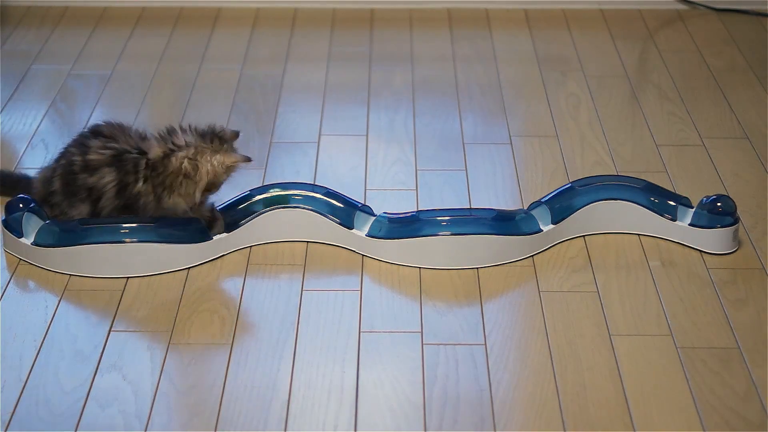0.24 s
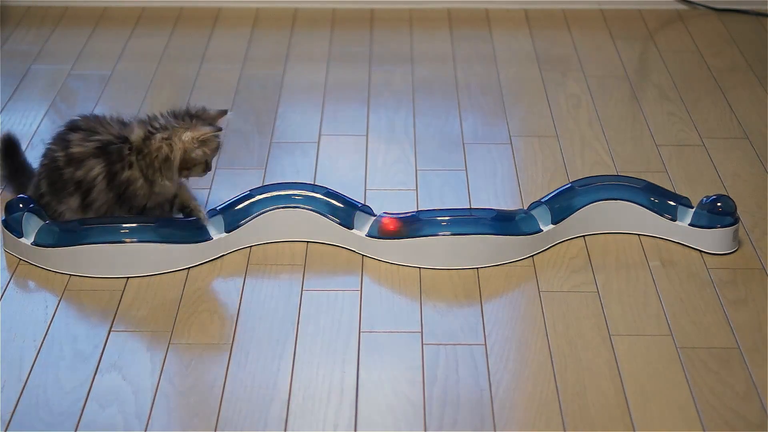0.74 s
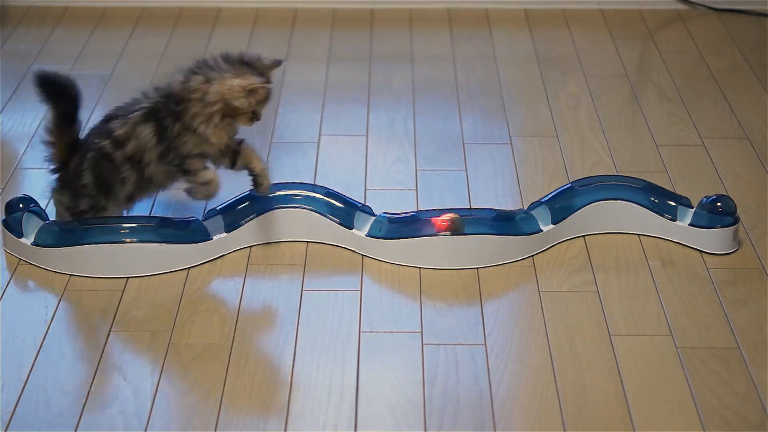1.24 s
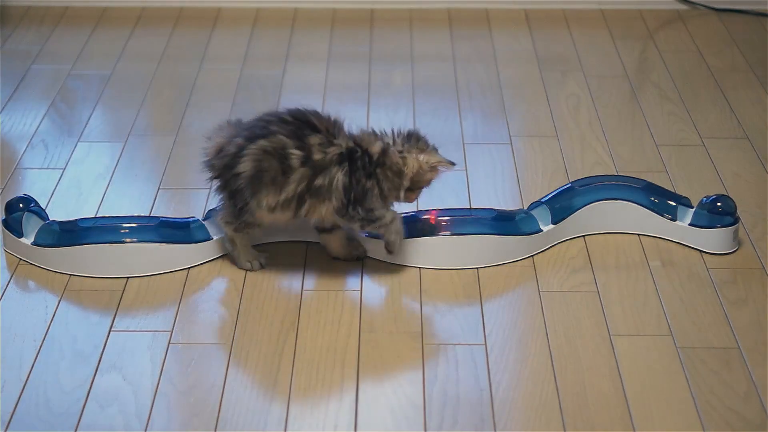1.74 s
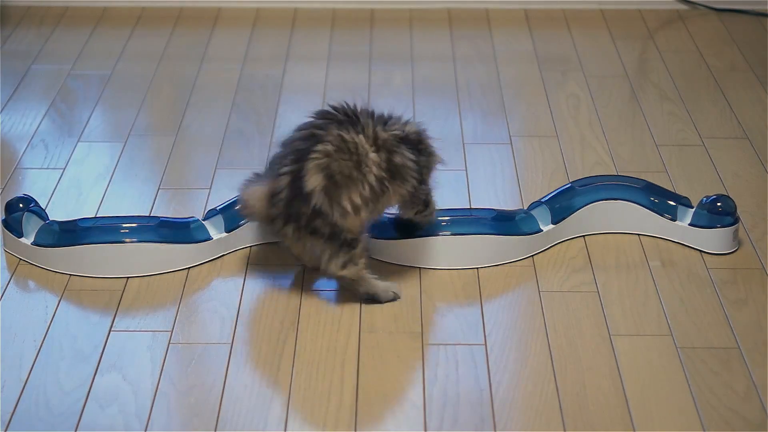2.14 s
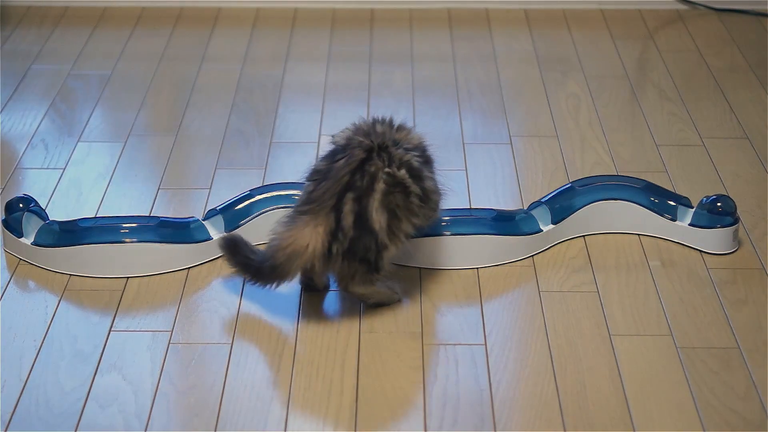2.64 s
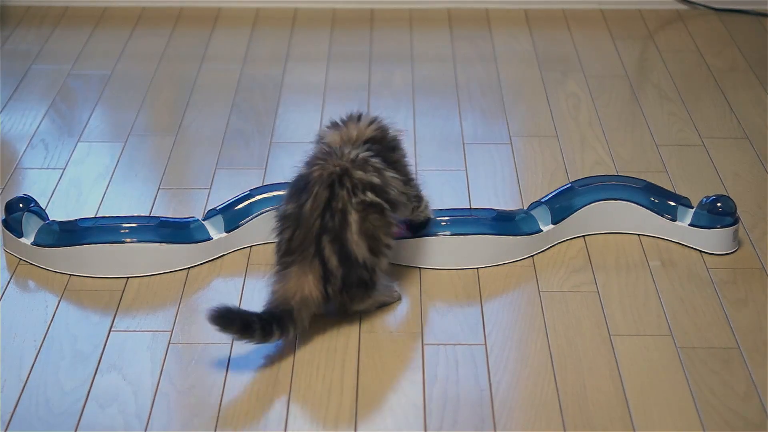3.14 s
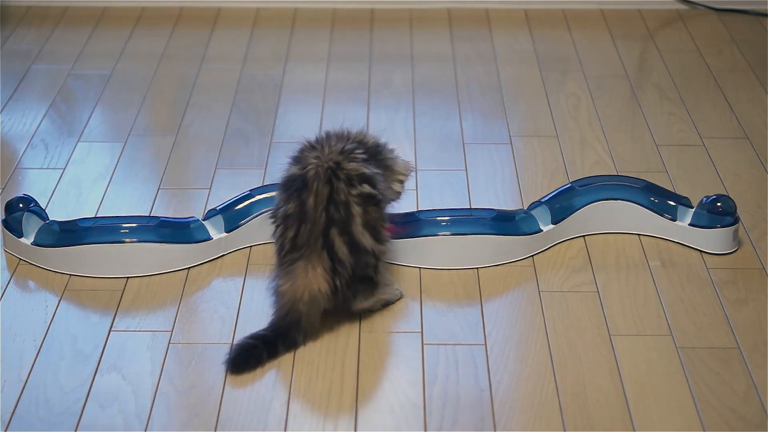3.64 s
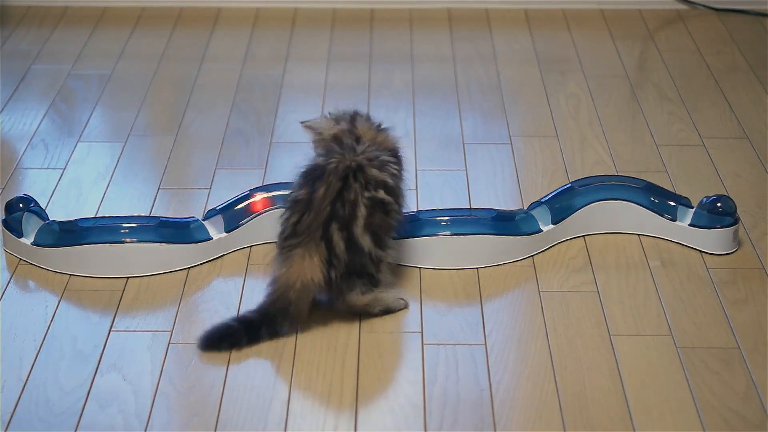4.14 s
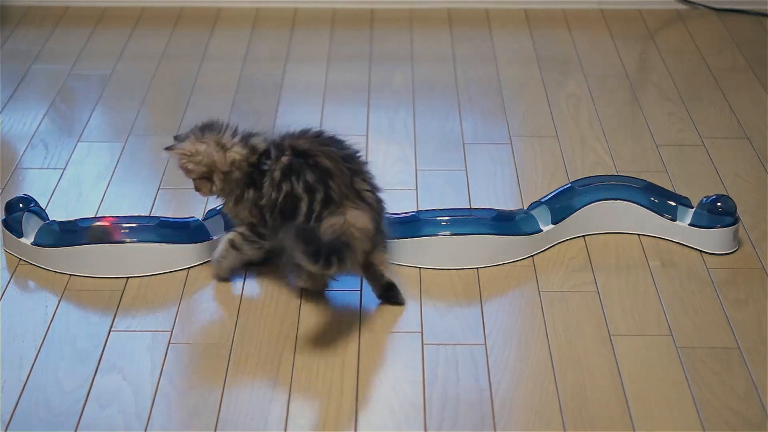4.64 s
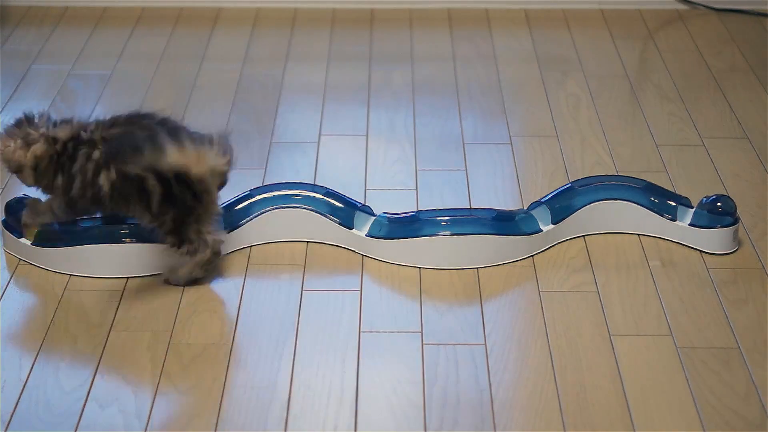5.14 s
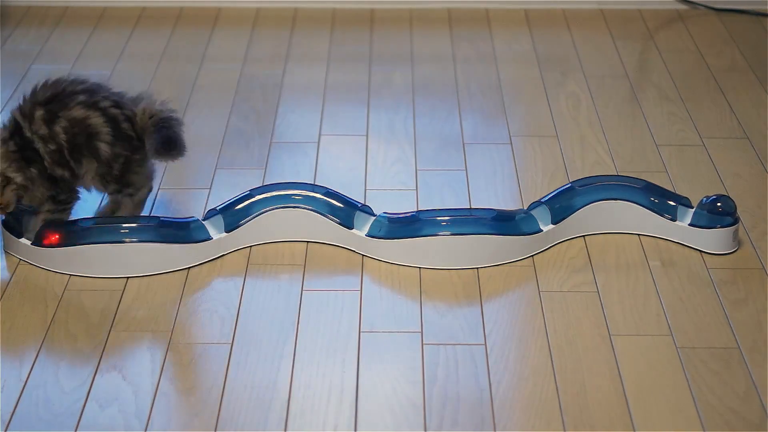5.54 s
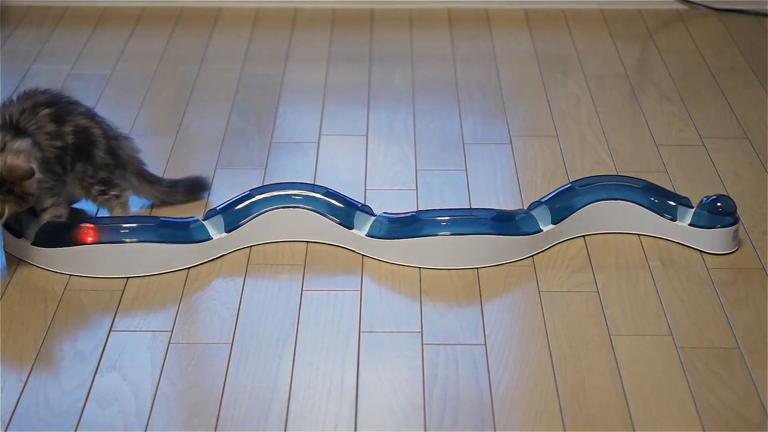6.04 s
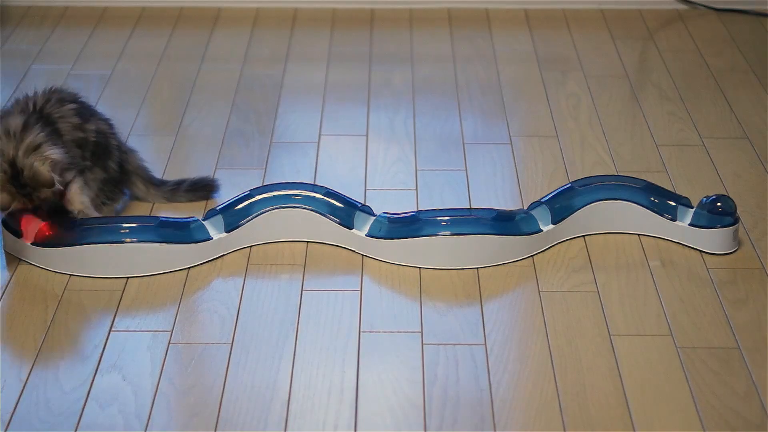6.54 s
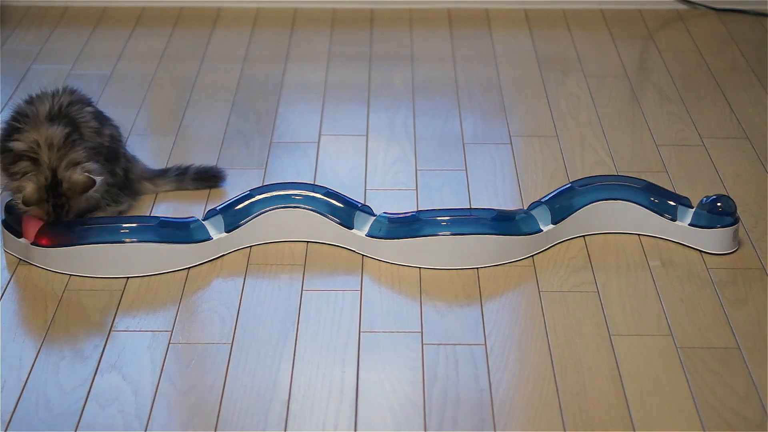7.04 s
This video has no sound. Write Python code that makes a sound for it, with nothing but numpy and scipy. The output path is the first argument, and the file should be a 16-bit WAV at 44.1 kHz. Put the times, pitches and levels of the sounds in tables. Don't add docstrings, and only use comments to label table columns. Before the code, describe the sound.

Uneven bursts of hollow plastic knocks and ball rolling as a kitten plays with a track toy on wooden boards, over soft ventilation hiss.

```python
import sys
import numpy as np
from scipy import signal
from scipy.fft import rfft, irfft
from scipy.io import wavfile
from scipy.ndimage import uniform_filter1d

SR = 44100
rng = np.random.default_rng(int(sys.argv[2]) if len(sys.argv) > 2 else 0)


def pcm_store(signal):
    levels = np.round(np.clip(np.atleast_2d(signal), -1, 1) * 32767)
    wavfile.write(sys.argv[1], SR, levels.astype(np.int16).T)


def attenuation_scalar(level_db):
    decades = np.asarray(level_db, float) / 20
    return 10 ** decades


N = 321489

# start in seconds, blow peak in dB, shell pitch in Hz,
# wall ring over shell in dB, wall pitch in Hz.
BALL_KNOCKS = [(0.275, -20.5, 1055, -13, 1840), (0.295, -23, 980, -14, 2290), (0.748, -31, 1200, -13, 2190),
               (0.78, -26, 1120, -3, 1890), (0.792, -35, 1380, 0.5, 2800), (3.086, -42, 1100, -9.5, 2200),
               (3.351, -51, 1130, -22, 2060), (4.052, -47.5, 1180, 2.5, 2680),
               (4.104, -33.5, 1670, -10, 1870), (4.354, -48, 990, -11, 1670),
               (4.393, -14, 1090, -7.5, 1950), (4.407, -15, 1001, -47, 1930), (4.96, -35, 1170, -5.5, 3517),
               (5.188, -36.5, 1100, -9, 2080), (5.347, -55, 1578, -3, 1830), (5.782, -32.5, 1379, -6, 2670),
               (6.187, -55.5, 1160, 4, 2560), (6.431, -20.5, 1131, -7, 1870)]
# start in seconds, blow peak in dB, shell pitch in Hz,
# wall ring over shell in dB, wall pitch in Hz.
PAW_BATS = [(0.206, -25, 1000, -12.5, 2290), (0.817, -25, 890, -11, 1890), (2.058, -28.5, 1228, -6.5, 1930),
            (2.084, -41, 1640, 0, 1930), (2.108, -25, 1230, -7.5, 2200), (2.129, -28, 980, -8.5, 1950),
            (2.752, -26, 1200, -6, 2260), (2.762, -25, 1130, -7, 1930), (2.777, -37, 1180, -8, 1810),
            (4.112, -24, 1080, -10.5, 2160), (4.157, -6.5, 1080, -22.5, 2710),
            (4.219, -30, 1250, -15, 2450), (4.249, -25.5, 1160, -16, 2260), (4.311, -31.5, 1060, -7, 2300),
            (4.344, -21.5, 1160, -4, 1960), (4.972, -44.5, 1360, 6, 1860), (5.218, -39.5, 1030, -0.5, 1760),
            (5.248, -32.5, 1120, -16, 1930), (5.441, -37, 1480, -3, 2700), (5.447, -31, 1520, -12.5, 2920),
            (6.004, -32.5, 930, -22, 2220), (6.459, -21.5, 1080, -17.5, 2350),
            (6.718, -40.5, 1120, -12, 2250)]
# start in seconds, blow peak in dB, shell pitch in Hz,
# wall ring over shell in dB.
BASE_BUMPS = [(0.307, -21, 995, -26), (0.319, -32, 980, -15), (0.334, -37, 1110, -22),
              (0.462, -39, 1010, -27), (0.694, -36, 920, -10), (0.869, -30.5, 950, -15.5),
              (1.689, -39, 1260, -8.5), (1.893, -29.5, 1150, -19), (2.006, -35, 970, -5.5),
              (2.648, -47, 1150, -11.5), (2.7, -31.5, 1000, -12.5), (2.925, -43, 910, -9),
              (2.96, -46, 1030, -20), (3.011, -46, 984, -16), (3.979, -42, 1100, -3),
              (4.449, -22, 1090, -10), (4.468, -25.5, 1055, -32), (5.307, -42.5, 1550, -20),
              (5.793, -31.5, 1051, -9.5), (6.445, -33, 1030, 0.5), (6.49, -35, 1005, -4.5),
              (7.072, -46, 1155, -10)]
BALL_CRACK_DB, PAW_CRACK_DB, BASE_CRACK_DB = -18, -31, -21.5
BASE_WALL_HZ = 2250
# ratio to shell pitch, width in Hz, level in dB.
CAVITY_MODES = [(.62, 200, -31), (.9, 120, 4), (1.03, 133, 65), (1.33, 248, -41)]
# ratio to wall pitch, width in Hz, level in dB.
WALL_MODES = [(.72, 460.5, -49), (1.0, 481, 9.5), (1.3, 647.8, -2.5), (1.8, 703, -9)]
# frequency in Hz, width in Hz, level in dB.
JOINT_MODES = [(765, 400, 13.5), (1550, 277, 14), (2770, 1870, -7)]
# frequency in Hz, width in Hz, level in dB.
CRACK_MODES = [(4800, 850, -11), (5820, 2700, 5.5), (9400, 4300, -3.5), (12000, 9400, -4)]
# fastest moment in seconds, shell level in dB, speeding up in seconds,
# slowing in seconds, shell pitch in Hz.
BALL_RUNS = [(0.26, -42.5, 0.1, 0.23, 1062), (0.768, -54.5, 0.77, 1, 1105), (1.6, -61.5, 0.22, .6, 1080),
             (2.084, -36.5, .15, 0.16, 1160), (2.622, -53, 0.17, 0.61, 1060),
             (2.932, -44, 0.05, 0.18, 1154), (3.3, -61.5, 0.53, 0.18, 1100), (4.162, -56, 0.16, 0.36, 1100),
             (4.32, -40, 0.24, 0.053, 1170), (4.7, -53.5, 0.91, 0.22, 1030), (4.95, -41, 0.19, 0.083, 1180),
             (5.2, -53, 0.26, 0.19, 1760), (5.33, -51.5, 0.16, 0.23, 1550), (5.65, -85, .15, 0.36, 1080),
             (6.0, -50, 0.28, .2, 1050), (6.5, -51.5, 0.22, 0.39, 1170), (7.05, -62, 0.32, 0.52, 1170)]
CREEP_DB, ROLL_WALL_DB = -74.5, -8
# peak in seconds, level in dB, onset in seconds, fade in seconds,
# squeak centre in Hz.
BRUSHES = [(0.0, -51, .01, 0.025, 4100), (0.626, -61.5, 0.24, 0.075, 5270), (0.79, -57, 0.025, 0.093, 4900),
           (1.285, -67, .06, .17, 4800), (1.694, -48.5, 0.0088, 0.023, 5150),
           (3.336, -57, 0.043, 0.061, 5250), (3.98, -59.5, .018, 0.085, 4250), (4.056, -60, .014, .1, 4150),
           (4.165, -48, .015, 0.048, 4450), (5.158, -60, 0.026, .12, 4200),
           (5.316, -61.5, .025, 0.11, 4050), (6.062, -54.5, 0.044, 0.19, 4300),
           (6.19, -58, 0.022, 0.029, 4080), (6.374, -56, 0.026, .028, 5050)]
# frequency in Hz, density in dB per Hz.
FRICTION_SPECTRUM = [(710, -39), (1200, 2), (2050, 5.5), (2770, 3), (3320, -3.5), (5730, -5.5),
                     (15500, -12.5)]
# start in seconds, peak in dB, pitch in Hz, t60 in seconds.
LANDINGS = [
    (1.445, -33, 272.7, 0.025),
]
# frequency in Hz, t60 in seconds.
REVERB_TIMES = [(250, 0.44), (700, 0.48), (1100, 0.34), (2500, 0.38), (6000, 0.28), (14000, 0.078)]
# delay in seconds, level in dB.
EARLY_ECHOES = [(.0055, -8.5), (.0078, -8), (0.011, -1), (0.0165, -21), (.021, -9.5), (.0235, -15.5)]
# frequency in Hz, density in dB per Hz.
AIR_SPECTRUM = [(12, -78), (20, -44), (187, -22), (228, -4), (301, -17.5), (377, -3.5), (513, -10),
                (607, -4.5), (738, -9), (976, -6.5), (1370, -11), (2260, -14.5), (2460, -17),
                (12800, -27.5), (16000, -29.5)]
AIR_DB = -54.5
# frequency in Hz, width in Hz, level in dB.
VENT_HUMS = [(165, 18.7, -76), (324, 35, -69), (398, 14, -67.5), (439.5, 12, -66), (611, 12, -68.5),
             (2248, 46, -69.5)]
# frequency in Hz, left-right likeness from -1 to 1.
COHERENCE = [(60, 0.25), (180, 0.95), (550, 0.52), (1650, -0.37), (4970, -0.078), (15000, 0.45)]
# frequency in Hz, left minus right in dB.
BALANCE = [(60, -1), (240, 2), (950, 0), (3770, 0.0), (15000, 0.0)]


def knock(db, shell_hz, wall_db, crack_db, wall_hz, chance):
    t = np.arange(len(chance[0])) / SR
    loose = np.clip((-db - 20.5) / 24, .15, 1.2)
    bounces = chance[0] * (chance[1] > 2.6) * loose * np.exp(-t / 0.014)
    bounces[0] = 1

    chatter = .055 * chance[1, :500] * np.exp(-t[:500] / .003)
    chatter[0] = 1
    crack_chatter = chatter * np.where(t[:500] > 0, 4.5, 1)
    crack = np.convolve(crack_chatter, ring(CRACK_MODES))[:1024]
    wall = np.convolve(chatter, wall_ring(wall_hz, -3.0))[:1024]

    damping = np.clip(2.5 + (wall_db + 9.5) / 14, .8, 2.5)
    body = ring(np.multiply(CAVITY_MODES, [1, damping, 1]), shell_hz)
    body += attenuation_scalar(wall_db + 6) * wall / np.linalg.norm(wall)
    body += attenuation_scalar(crack_db + 1.5) * crack / np.linalg.norm(crack)
    return attenuation_scalar(db + 16.5) * signal.fftconvolve(bounces, body)


def rolling():
    level, shell_hz = swells(BALL_RUNS)
    strength = attenuation_scalar(2.5 * np.minimum(rng.exponential(1, N), 4))
    clicks = strength * (rng.random(N) < 900 / SR)
    clicks *= rng.choice([-1, 1], N)
    shell = evened(resonate(clicks, shell_hz, 304))
    wall = evened(signal.oaconvolve(clicks, wall_ring(2424, 0.5))[:N])
    return attenuation_scalar(-5) * (level + attenuation_scalar(CREEP_DB)) * (shell + attenuation_scalar(ROLL_WALL_DB) * wall)


def scuffing():
    level, squeak_hz = swells(BRUSHES)
    hiss = rng.standard_normal(N)
    roughness = evened(uniform_filter1d(rng.standard_normal(N), 90))
    grain = hiss * attenuation_scalar(1.8 * roughness)
    claws = evened(resonate(grain, squeak_hz, 1350))
    return level * (attenuation_scalar(3.5) * coloured(grain, FRICTION_SPECTRUM) + attenuation_scalar(-8.5) * claws)


def thud(db, hz, t60):
    t = np.arange(6000) / SR
    boards = np.sin(2 * np.pi * hz * t) + 0.58 * np.sin(2 * np.pi * 1.85 * hz * t)
    onset = 1 - np.exp(-t / 0.0012)
    return attenuation_scalar(db - 0.5 - 60 * t / t60) * boards * onset


def room(x):
    shared, tail_db = 0.78, 2
    taps = np.zeros((2, SR // 2))
    jitter = rng.integers(0, 20, (2, (SR // 2 - 201) // 20))
    at = np.arange(200, SR // 2 - 20, 20) + jitter
    np.put_along_axis(taps, at, rng.choice([-1., 1.], at.shape), 1)
    taps = np.sqrt(shared) * taps[0] + np.sqrt(1 - shared) * taps[1] * [[1], [-1]]

    hz, t, z = signal.stft(taps, SR, nperseg=256)
    decay = attenuation_scalar(-60 * t / read(REVERB_TIMES, hz)[:, None])
    response = signal.istft(z * decay, SR, nperseg=256)[1]
    response *= attenuation_scalar(tail_db) / np.linalg.norm(response[0])
    response[:, 0] += 1
    for s, db in EARLY_ECHOES:
        place = round(s * rng.uniform(.93, 1.07) * SR) + rng.integers(0, 4, 2)
        response[[0, 1], place] += attenuation_scalar(db) * rng.choice([-1, 1])
    return signal.oaconvolve(x[None], response, axes=1)[:, :N] / np.linalg.norm(response[0])


def air():
    frames, hz = N // 512 + 5, np.fft.rfftfreq(2048, 1 / SR)
    a, b, c, d, patches = rng.standard_normal((frames, 1025, 5)).T
    patches = uniform_filter1d(patches, 14, 0)
    patches = evened(uniform_filter1d(patches, 8, 1))

    power = attenuation_scalar(2 * read(AIR_SPECTRUM, hz))
    power *= attenuation_scalar(2 * AIR_DB) / power.sum()
    for f, width, db in VENT_HUMS:
        line = np.exp(-2 * ((hz - f) / width) ** 2)
        power += attenuation_scalar(2 * db) * line / line.sum()

    same = np.clip(read(COHERENCE, hz), -1, 1)[:, None]
    left = a + 1j * b
    right = same * left + np.sqrt(1 - same ** 2) * (c + 1j * d)
    z = np.array([left, right])
    drift = attenuation_scalar(0.8 * patches / (1 + (hz[:, None] / 2000) ** 2))
    z *= np.sqrt(power)[:, None] * drift
    z *= attenuation_scalar(np.multiply.outer([.5, -.5], read(BALANCE, hz)))[:, :, None]
    noise = signal.istft(z, nperseg=2048, noverlap=1536)[1][:, :N]
    return np.sqrt(power.sum()) * evened(noise)


def ring(modes, scale=1):
    t = np.arange(1024) / SR
    out = np.zeros(1024)
    for f, width, db in modes:
        envelope = t * np.exp(-2 * np.pi * width * t)
        out += attenuation_scalar(db) * width ** 0.58 * envelope * np.cos(2 * np.pi * f * scale * t)
    return out / np.linalg.norm(out)


def wall_ring(hz, joints_db):
    return ring(WALL_MODES, hz) + attenuation_scalar(joints_db) * ring(JOINT_MODES)


def resonate(x, hz, width):
    turn = np.exp(2j * np.pi * np.cumsum(hz) / SR)
    r = np.exp(-2 * np.pi * width / SR)
    smooth = signal.lfilter([(1 - r) ** 2], [1, -2 * r, r * r], x / turn)
    return 2 * (turn * smooth).real


def swells(rows):
    t, fine = np.arange(0, N / SR + .002, .001), np.arange(N) / SR
    floor = 3 * 20
    level = np.zeros(len(t))
    for s, db, rise, fall, _ in rows:
        times = [s - 3 * rise, s, s + 3 * fall]
        level += attenuation_scalar(np.interp(t, times, [db - floor, db, db - floor]))
    peaks, pitches = np.transpose(rows)[[0, 4]]
    return np.interp(fine, t, level), np.interp(fine, peaks, pitches)


def coloured(x, points):
    gain = attenuation_scalar(read(points, np.fft.rfftfreq(len(x), 1 / SR)))
    return evened(irfft(rfft(x) * gain, len(x)))


def read(points, hz):
    f, value = np.transpose(points)
    return np.interp(np.log(hz + 1), np.log(f + 1), value)


def evened(x):
    return x / np.sqrt(np.mean(x ** 2) + 1e-20)


def add(mix, s, sound):
    part = mix[round(s * SR):][:len(sound)]
    part += sound[:len(part)]


def scene():
    knocks = []
    for rows, crack_db in [(BALL_KNOCKS, BALL_CRACK_DB), (PAW_BATS, PAW_CRACK_DB)]:
        for s, db, shell_hz, wall_db, wall_hz in rows:
            knocks.append((s, db, shell_hz, wall_db, crack_db, wall_hz))
    for row in BASE_BUMPS:
        knocks.append((*row, BASE_CRACK_DB, BASE_WALL_HZ))

    spots = np.zeros((4, N))
    chance = rng.standard_normal((len(knocks), 2, 3000))
    for k, (s, *blow) in enumerate(knocks):
        add(spots[1 + k % 3], s + .0006, knock(*blow, chance[k]))
    for s, *landing in LANDINGS:
        add(spots[0], s, thud(*landing))
    spots[0] += attenuation_scalar(-14) * spots[1:].sum(0)
    spots[1] += rolling()
    spots[2] += scuffing()

    small_shell = signal.butter(3, 780, "high", fs=SR, output="sos")
    stiff_boards = signal.butter(4, 170, "high", fs=SR, output="sos")
    spots[1:] = signal.sosfilt(small_shell, spots[1:])
    spots[0] = signal.sosfilt(stiff_boards, spots[0])
    return sum(room(spot) for spot in spots) + air()


def roll_off(x):
    return signal.sosfilt(signal.butter(12, 16150, fs=SR, output="sos"), x)


def record(dry):
    edge = signal.firwin(511, 15800, window=("kaiser", 9), fs=SR)
    mix = signal.oaconvolve(dry, edge[None], "same")
    return roll_off(mix)


dry = scene()
out = record(dry)
pcm_store(out)
```